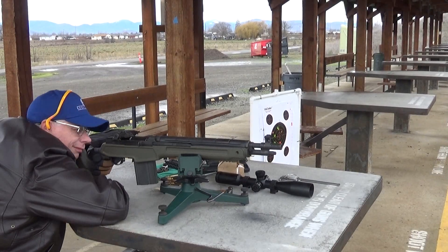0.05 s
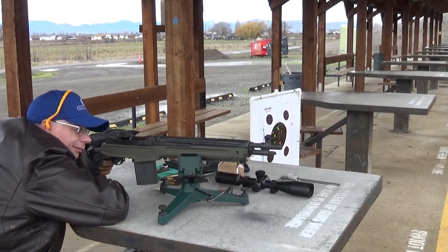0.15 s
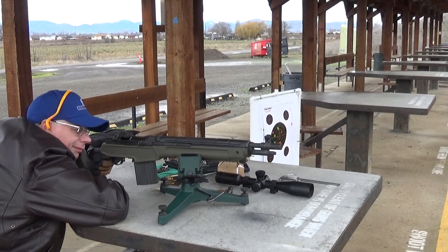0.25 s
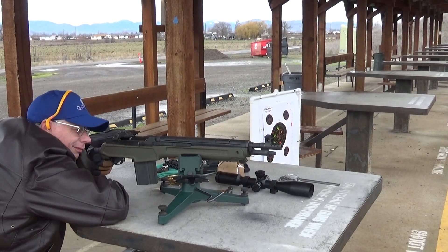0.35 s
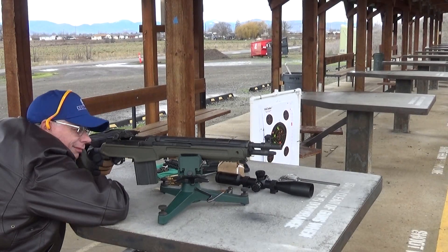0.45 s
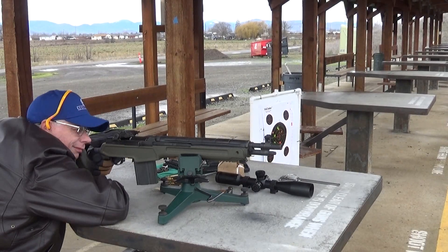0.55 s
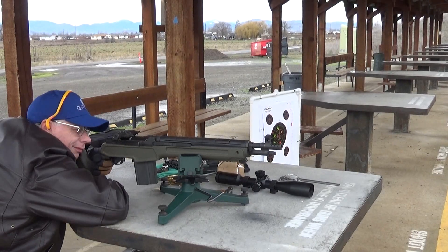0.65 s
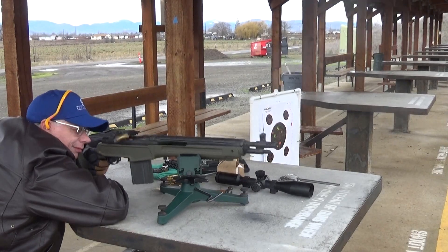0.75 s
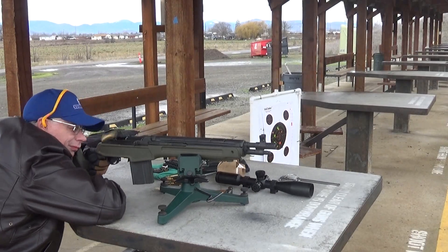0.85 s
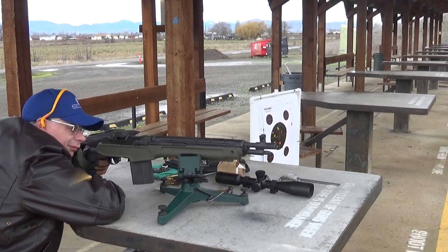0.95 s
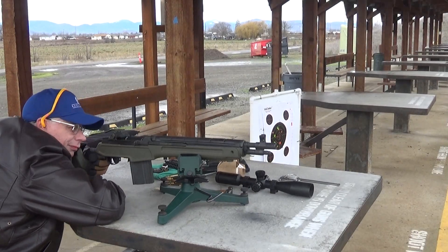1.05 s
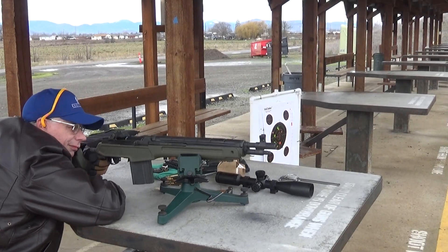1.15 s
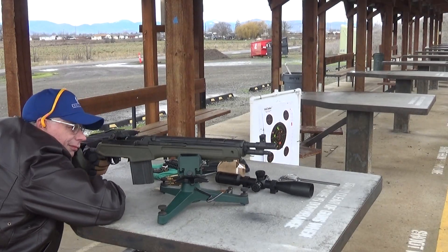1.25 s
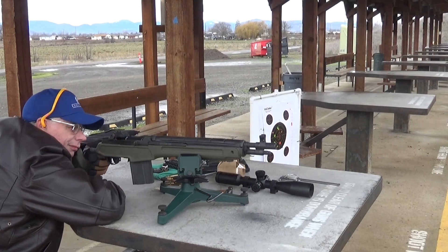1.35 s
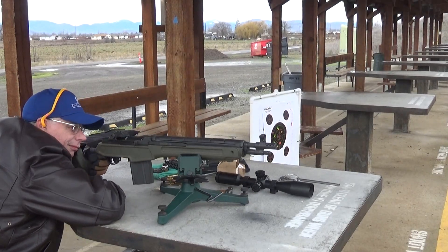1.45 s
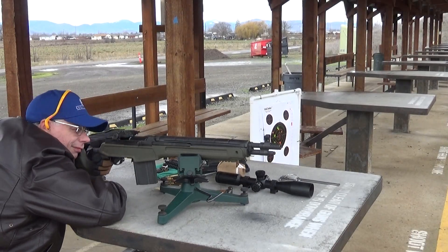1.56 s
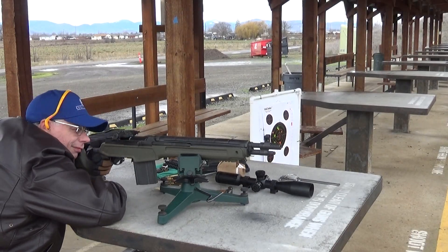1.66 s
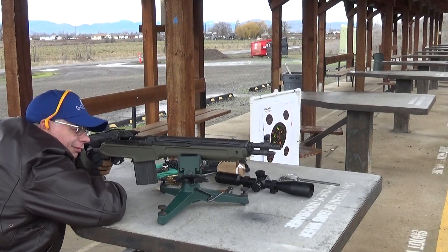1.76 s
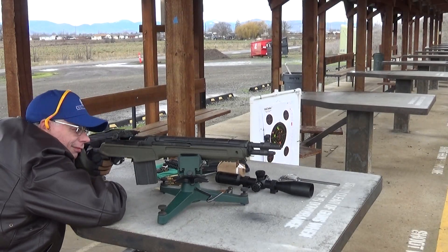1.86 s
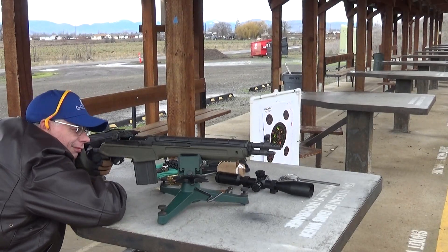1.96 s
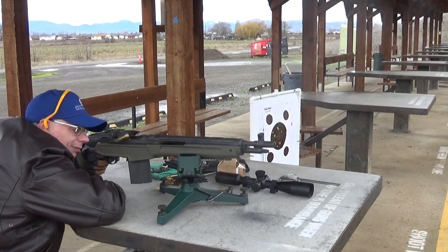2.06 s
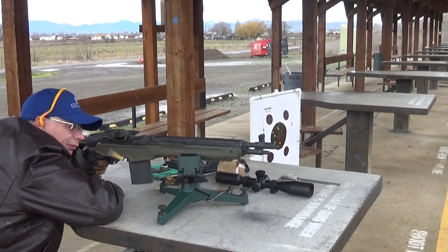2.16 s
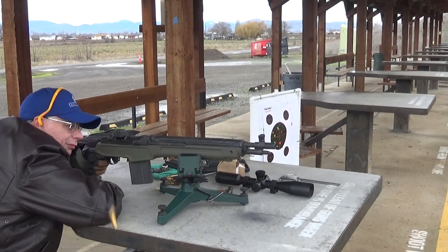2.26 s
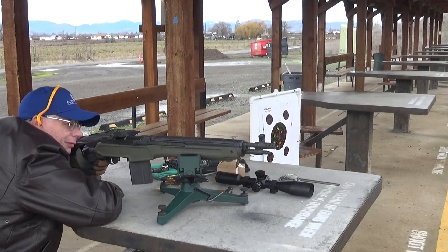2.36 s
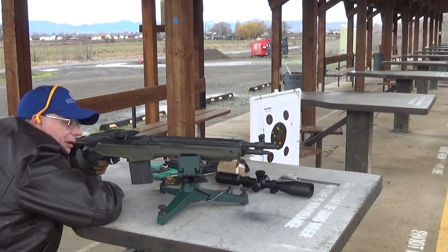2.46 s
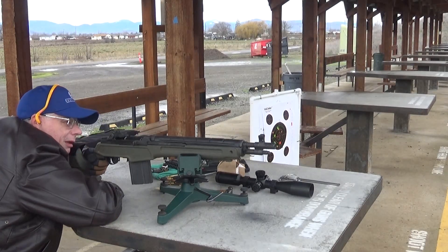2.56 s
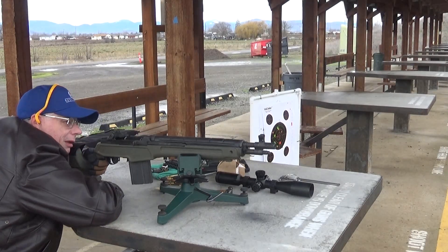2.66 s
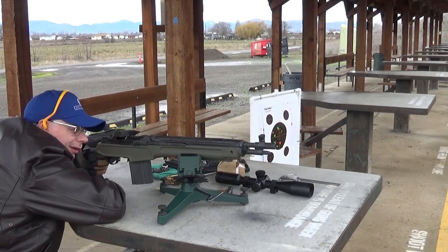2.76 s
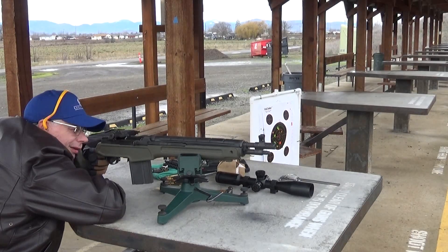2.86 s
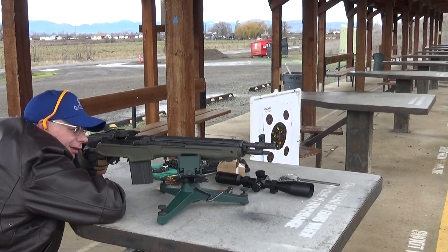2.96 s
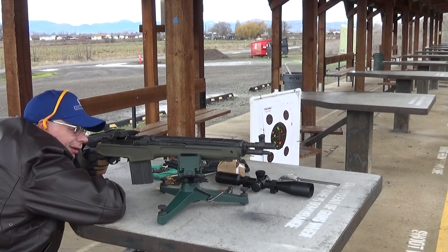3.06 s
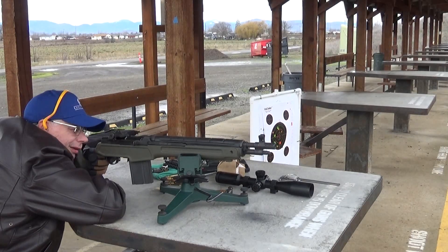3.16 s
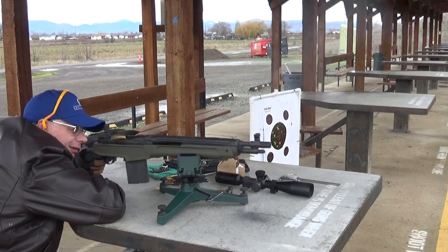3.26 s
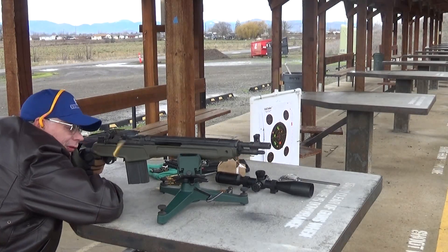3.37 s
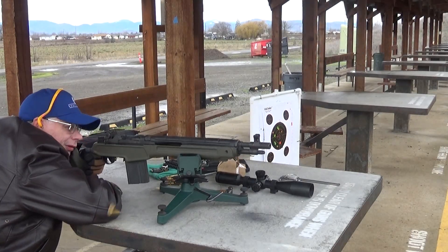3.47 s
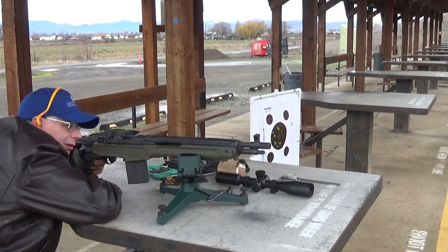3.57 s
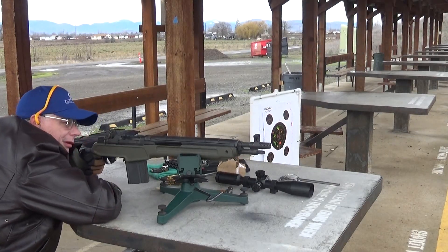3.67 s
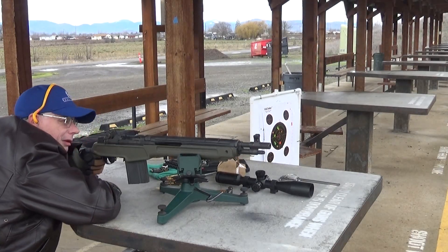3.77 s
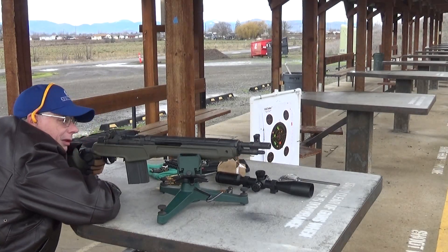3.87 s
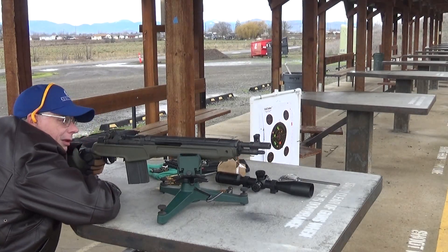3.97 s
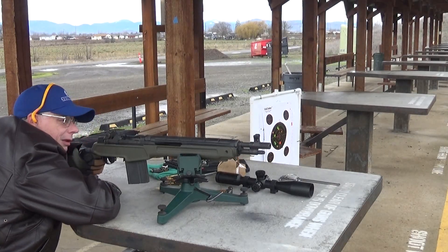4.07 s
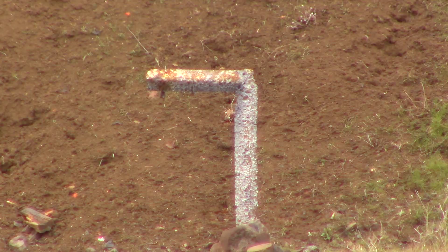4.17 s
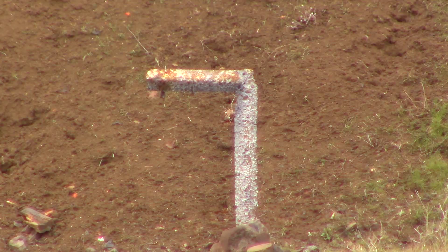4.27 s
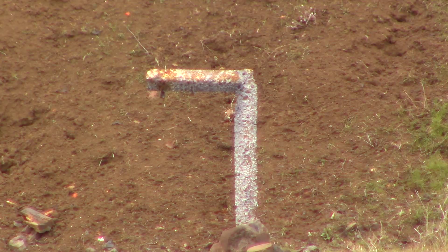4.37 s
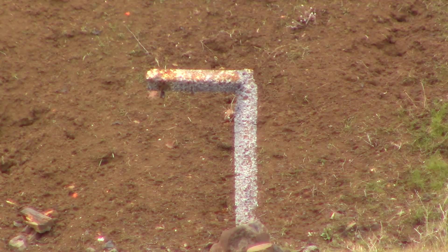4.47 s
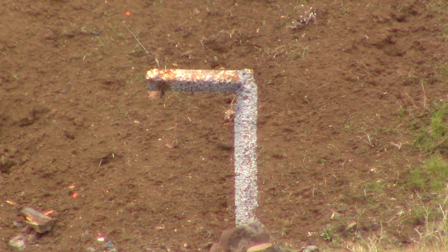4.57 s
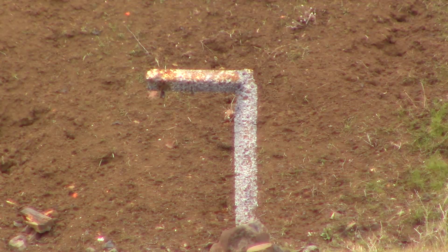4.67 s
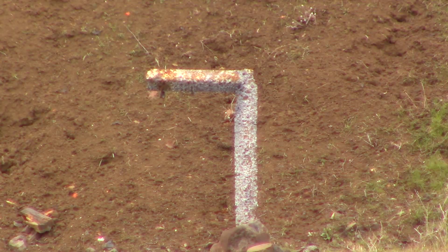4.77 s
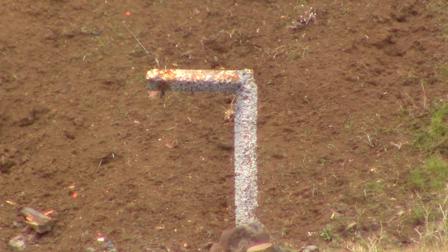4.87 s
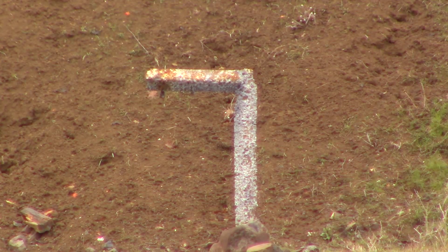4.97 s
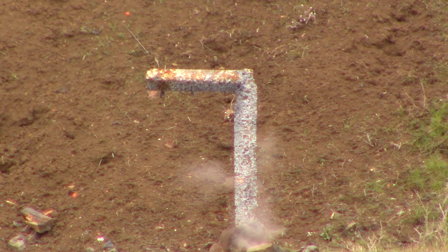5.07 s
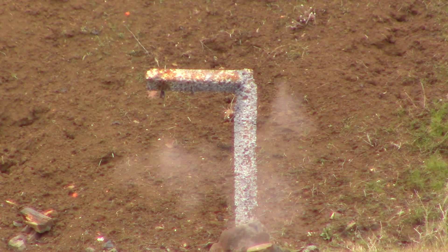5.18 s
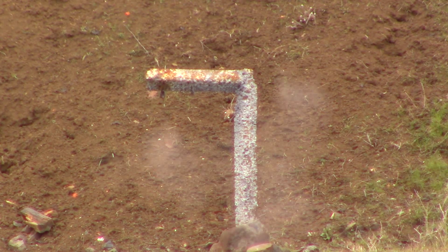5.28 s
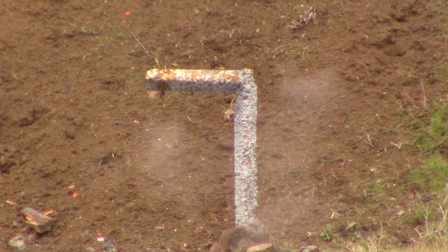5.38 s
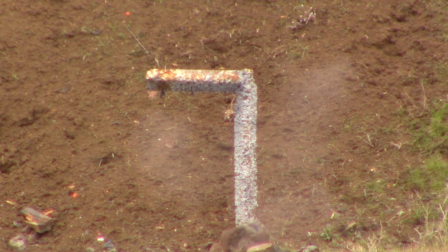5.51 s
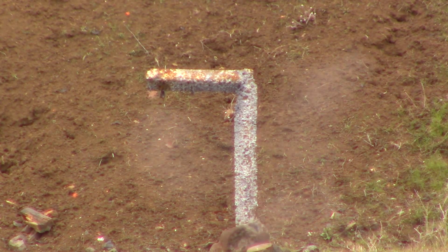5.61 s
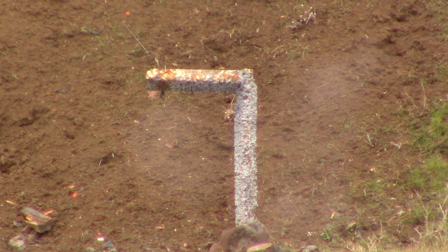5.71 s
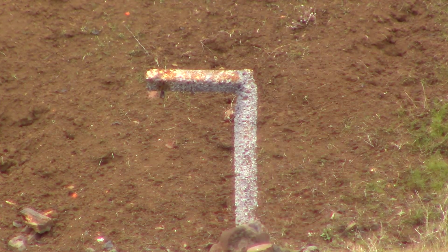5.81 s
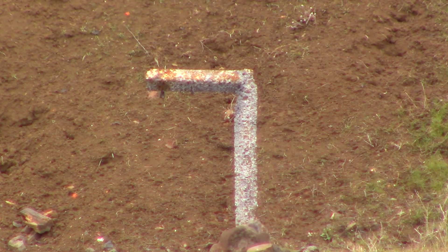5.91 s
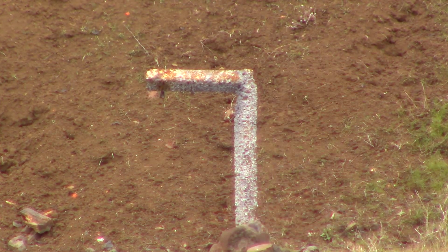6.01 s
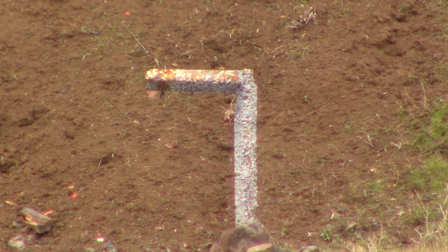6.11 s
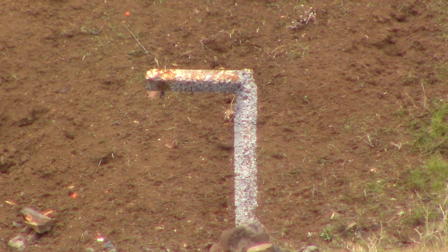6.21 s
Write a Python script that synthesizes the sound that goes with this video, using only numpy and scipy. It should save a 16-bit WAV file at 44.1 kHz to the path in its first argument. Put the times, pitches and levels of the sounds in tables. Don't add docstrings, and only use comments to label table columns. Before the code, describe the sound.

Three deliberate rifle shots, loud and slightly overloaded, are heard in stereo from near the shooter, with faint ticking from a distant motor beforehand. Each has a tiny hammer tick, a full blast, a dense echo roll and a bright ringing case on concrete. A hard cut moves downrange, where a supersonic snap precedes a duller boom and scattered returns from banks. Another cut leaves only soft wind and traffic.

```python
import sys
import numpy as np
from scipy import signal
from scipy.io import wavfile
from scipy.ndimage import map_coordinates

SR = 44100
rng = np.random.default_rng(int(sys.argv[2]) if len(sys.argv) > 2 else 0)


def wav_record(signal):
    frames = np.transpose(np.atleast_2d(signal))
    bounded = np.clip(frames, -1, 1)
    quanta = np.round(bounded * 32767).astype(np.int16)
    wavfile.write(sys.argv[1], SR, quanta)


def invert_db(level):
    return 10 ** (np.asarray(level, dtype=float) / 20)


N = 275625

# (blast_s, roll_stop_s)
SHOTS = [
    (0.7888, 1.593),
    (2.0818, 2.797),
    (3.3259, 4.178),
]
# (pitch_hz, level_db)
ROLL_COLOUR = [(60, -22.5), (130, -1.5), (210, 2.2), (350, -0.06), (1000, 3), (4000, 1.5), (9000, -2.84),
               (16000, -12.5)]
# (pitch_hz, likeness 0 to 1)
ROOF_LIKENESS = [(60, 0.93), (300, 0.68), (1400, 0.58), (7000, 0.77), (15000, 1)]
# (delay_s, (level_db per octave, centre_hz, skirt_db per octave, rise_s, fall_db per s))
BLAST = (0, (38, 7500, 6.8, .002, 252))
ROOF = (.001, (39.5, 775, 5, .018, 207))
BOOM = (0, (9, 336, 22, .032, 81))
FIELD = (.07, (-26, 3300, 10, .07, 22))
TREE_LINE = (.22, (-20, 5600, 12.5, .008, 109))
FAR_BOOM = (.4, (-28.5, 290, 14, .07, 36))
LAST_BANK = (.7, (-29.5, 2660, 17, .2, 13))


def rifle():
    out = np.zeros((2, N))
    same = rng.standard_normal((2, 2, SR))
    roof_dulling, field_dulling = .174, .12
    answers = [(*a, roof_dulling) for a in (BLAST, ROOF, BOOM)]
    answers += [(*a, field_dulling) for a in (FIELD, TREE_LINE, FAR_BOOM, LAST_BANK)]
    for blast_s, roll_stop_s in SHOTS:
        size = round((roll_stop_s - blast_s) * SR)
        fresh = rng.standard_normal((2, 2, size))
        fresh = signal.sosfilt(signal.butter(1, 1500, "high", fs=SR, output="sos"), fresh)
        white = same[..., :size] + 1.076 * fresh
        t = np.arange(size) / SR
        shot = steep(roll(answers, 0, ROLL_COLOUR, white, ROOF_LIKENESS), 110, "high")
        lows = signal.sosfilt(signal.butter(1, 2500, fs=SR, output="sos"), shot)
        shot = shot - lows * np.exp(-t / 0.0009)
        add(out, shot * invert_db([[-.4], [.4]]), blast_s)

        push = np.sin(2 * np.pi * 95 * t) * np.exp(-((t - .05) / 0.029) ** 2)
        add(out, invert_db([[-25], [-23]]) * push, blast_s)

        t = t[:round(.007 * SR)]
        tick_shape = t / 0.00096 * np.exp(1 - t / 0.0017) + 0.04
        tick = band(rng.standard_normal(len(t)), 1800, 16000) * tick_shape
        add(out, invert_db(-15) * tick, blast_s - .0072)
    return out


# (start_s, click_level_db, ring_level_db, click_pitch_hz)
BOUNCES = [
    (1.4029, 15, -18.5, 6700),
    (1.416, -23, -29, 6500),
    (2.6167, 0, -15.5, 4930),
    (2.6296, 14, -40, 6260),
    (2.641, -13, -26, 6000),
    (3.8868, 8.5, -31, 3780),
    (3.8970, -3, -21.5, 3200),
]
# (pitch_hz, level_db, t60_s)
CASES = [
    [(9539, -3, .3), (9615, 0, .28), (12440, -5, .26), (12490, -3, .25), (14760, -4, .36), (14850, -6, .35)],
    [(9520, -2, .3), (9600, -3, .3), (12510, -3, .24), (12570, -5, .23), (14620, -4, .23), (14740, -2, .23),
     (1720, -2, .03)],
    [(9615, 0, .27), (9695, -4, .29), (9798, -6, .25), (12620, -9, .33), (12700, -11, .3), (14690, -8, .3),
     (14830, -7, .27)],
]


def cases():
    out = np.zeros((2, N))
    chance = rng.random((len(BOUNCES), 8))
    tumbling = invert_db(4.5 * np.array([drift(90, SR // 3) for mode in range(8)]))
    t = np.arange(round(.09 * SR)) / SR
    roof = invert_db(-35.5) * rng.standard_normal((2, len(t))) * invert_db(-60 * t / 0.1) * (t > .003)
    roof[:, 0] = 1
    for (start_s, click_db, ring_db, click_hz), luck in zip(BOUNCES, chance):
        shot = sum(start_s > blast_s for blast_s, roll_stop_s in SHOTS) - 1
        hit = np.zeros((1, round((SHOTS[shot][1] - start_s) * SR)))
        size = hit.size
        rise = 1 - np.exp(-np.arange(size) / SR / 0.00019)
        for k, (hz, db, t60_s) in enumerate(CASES[shot]):
            mode = ring(hz, t60_s, 2 * np.pi * luck[k])[:size]
            waver = (rise * tumbling[k, :size])[:len(mode)]
            hit[0, :len(mode)] += invert_db(ring_db + db) * mode * waver
        click = invert_db(click_db) * ring(click_hz, 2.9 / click_hz)
        hit[0, :len(click)] += click
        add(out, signal.fftconvolve(hit, roof, axes=1)[:, :size], start_s)
    return out


# (pitch_hz, level_db)
FAR_COLOUR = [(100, -9), (250, -3.5), (400, -0.5), (900, -7), (1500, 1.4), (5000, 1), (9000, 1.5),
              (16000, -22.5)]
# (pitch_hz, likeness 0 to 1)
OPEN_LIKENESS = [(60, 1), (300, 0.98), (1400, 0.77), (7000, 0.57), (15000, 1)]
# (centre_s, level_db, low_hz, high_hz, half_length_s)
ECHOES = [(5.3280, -8, 1005, 8800, 0.0019), (5.355, -13, 2180, 8300, .014),
          (5.387, -12.5, 1220, 3780, 0.013), (5.427, -13, 1050, 3730, 0.0022),
          (5.441, -13.5, 1136, 3950, 0.014), (5.499, -17.5, 1090, 2420, 0.0081),
          (5.515, -21, 1090, 2500, 0.0058), (5.541, -20, 990, 4630, 0.0032),
          (5.568, -27, 1200, 3800, 0.002), (5.605, -29, 1460, 2570, 0.0087),
          (5.616, -19, 1100, 3360, 0.002), (5.69, -35, 900, 2900, 0.017), (5.748, -29, 250, 2180, 0.0074),
          (1.579, -28.5, 2500, 7000, .002), (1.586, -28, 2000, 7900, 0.0024),
          (4.115, -30.5, 2500, 6500, 0.0021), (4.1235, -36, 5000, 9800, 0.0024),
          (0.86, -15, 9700, 11030, 0.0025), (0.522, -56, 2500, 3180, 0.03)]
# (start_s, (level_db per octave, centre_hz, skirt_db per octave, rise_s, fall_db per s))
WHIP = (4.929, (-7.5, 4200, 10.5, .001, 112))
MUZZLE_BOOM = (5.066, (-4, 430, 6.5, .002, 122))
BANK_RETURN = (5.078, (-13.5, 3300, 8, .025, 78))
ECHO_WASH = (5.325, (-19, 3300, 9, .015, 82))
VALLEY = (5.35, (-29.5, 1700, 14, .16, 10))
LOW_BED = (5.328, (-37, 314, 16, .033, 24))
LATE_BOOM = (5.6, (-31, 317, 17, .03, 55))


def downrange():
    out = np.zeros((2, N))
    open_dulling = .28
    late = [MUZZLE_BOOM, BANK_RETURN, ECHO_WASH, VALLEY, LOW_BED, LATE_BOOM]
    for group, end_s, likeness in (([WHIP], 5.066, ROOF_LIKENESS), (late, 5.867, OPEN_LIKENESS)):
        start_s = group[0][0]
        white = rng.standard_normal((2, 2, round((end_s - start_s) * SR)))
        answers = [(begin_s, answer, open_dulling) for begin_s, answer in group]
        add(out, roll(answers, start_s, FAR_COLOUR, white, likeness), start_s)
    for centre_s, db, low_hz, high_hz, half_s in ECHOES:
        t = np.arange(-.04, .04, 1 / SR)
        burst = band(rng.standard_normal(len(t)), low_hz, high_hz) * np.sqrt(SR / 2 / (high_hz - low_hz))
        burst = steep(burst, 0.62 * low_hz, "high")
        burst = steep(burst, min(1.75 * high_hz, 10500), "low")
        grain = invert_db(3.2 * drift(400, len(t)))
        swell = np.exp(-(t / half_s * np.where(t < 0, 1.5, 1)) ** 2 / 2)
        add(out, invert_db(db) * burst * grain * swell, centre_s + t[0])
    return steep(out, 232, "high") * invert_db([[.55], [-.55]])


# (start_s, peak_level_db, pitch_hz, length_cycles, first swing + or -)
SHOCKS = [(4.9256, 6.5, 4000, 4.1, -1), (4.9285, 10, 2910, 2.29, -1), (5.0636, 1.5, 1750, 1.35, -1),
          (5.0639, 2.5, 362, 1.8, 1), (5.0677, -9, 2430, 7.7, -1), (5.1265, -13, 424, 1.4, 1),
          (5.159, -18, 450, 1.6, 1), (5.2353, -11, 490, 2.6, -1), (5.3232, -3.5, 1500, 1.04, -1),
          (5.3266, -8.5, 1110, 2.7, -1), (1.5892, -20.5, 350, 1.2, 1), (4.1265, -12, 223, 1.12, 1)]


def shocks():
    out = np.zeros((2, N))
    for start_s, db, hz, cycles, sign in SHOCKS:
        turn = np.arange(int(cycles / hz * SR)) * hz / SR
        swing = np.sin(2 * np.pi * turn) * (1 - (turn / cycles) ** 12.0)
        add(out, np.sign(sign) * invert_db(db) * swing, start_s)
    return signal.sosfilt(signal.butter(2, 110, "high", fs=SR, output="sos"), out)


# (start_s, depth_db, recovery_s)
DUCKS = [
    (4.926, 8, .065),
    (5.064, 7, .045),
]
EDGES_HZ = 35 * 2 ** (np.arange(28) / 3)


def roll(answers, start_s, colour, white, likeness):
    ceiling_db, release_db_per_s = -9.5, 300
    low_lag = 0.5
    uneven_db = 1.5
    hz = np.sqrt(EDGES_HZ[1:] * EDGES_HZ[:-1])[:, None]
    t = start_s + np.arange(0, white.shape[-1] + 32, 32) / SR
    power = 1e-12
    for begin_s, (db, centre_hz, skirt_db, rise_s, fall_db), dulling in answers:
        age = np.maximum(t - begin_s, 0)
        skirt = skirt_db * (np.hypot(1, np.log2(hz / centre_hz)) - 1)
        fall = fall_db * age * (hz / centre_hz) ** dulling
        slow_rise_s = rise_s * np.maximum(centre_hz / hz, 1) ** low_lag
        growth = 1 - np.exp(-age / slow_rise_s)
        power = power + (invert_db(db - skirt - fall + at_hz(colour, hz)) * growth) ** 2

    over_db = np.maximum(10 * np.log10(power.sum(axis=0) / 3) - ceiling_db, 0)
    recovery_db = release_db_per_s * t
    cut_db = np.maximum.accumulate(over_db + recovery_db) - recovery_db
    for duck_s, depth_db, recovery_s in DUCKS:
        cut_db = cut_db + depth_db * (t > duck_s) * np.maximum(1 - (t - duck_s) / recovery_s, 0)

    per_hz = 10 * np.log10(power * SR / 2 / (hz * np.log(2)))
    per_hz = per_hz - cut_db + uneven_db * drift(70 * 32, len(t))
    fine = start_s + np.arange(white.shape[-1]) / SR

    def level_db(band_hz):
        return np.interp(fine, t, per_hz[np.argmin(np.abs(hz - band_hz))])

    return bank(white, level_db, likeness)


def bank(white, level_db, likeness):
    out = 0
    for k, (low_hz, high_hz) in enumerate(zip(EDGES_HZ, EDGES_HZ[1:])):
        mid, side = band(white[k % 2], low_hz, high_hz)
        hz = np.sqrt(low_hz * high_hz)
        alike = np.clip(at_hz(likeness, hz), 0, 1)
        stereo = np.sqrt(1 + alike) * mid + np.sqrt(1 - alike) * side * [[1], [-1]]
        out = out + invert_db(level_db(hz)) * stereo
    return out / np.sqrt(2)


def ring(hz, t60_s, phase=0):
    t = np.arange(int(t60_s * SR) + 8) / SR
    return np.sin(2 * np.pi * hz * t + phase) * invert_db(-60 * t / t60_s)


def band(x, low_hz, high_hz):
    return signal.sosfilt(signal.butter(2, [low_hz, high_hz], "band", fs=SR, output="sos"), x)


def steep(x, hz, kind):
    return signal.sosfilt(signal.butter(4, hz, kind, fs=SR, output="sos"), x)


def drift(rate_hz, size):
    knots = rng.standard_normal(int(size * rate_hz / SR) + 3)
    return map_coordinates(knots, [np.arange(size) * rate_hz / SR], order=3)


def at_hz(points, hz):
    table_hz, value = np.transpose(points)
    return np.interp(np.log(hz), np.log(table_hz), value)


def add(out, x, start_s):
    i = round(start_s * SR)
    out[:, i:i + x.shape[-1]] += x[..., :N - i]


def idling_tick():
    t = np.arange(round(.775 * SR)) / SR
    beat = np.maximum(np.sin(2 * np.pi * 30.05 * (t - .014)), 0) * invert_db(drift(20, len(t)))
    phase = 2 * np.pi * np.cumsum(1 + .012 * drift(90, len(t))) / SR
    return invert_db(-53) * beat * (np.sin(2715 * phase) + invert_db(-13) * np.sin(3480 * phase))


def air(spectrum, levels, start_s, end_s, patchy_db):
    size = round((end_s - start_s) * SR)
    gusts = drift(6.8, size)

    def level_db(hz):
        lumps = patchy_db * (.5 * gusts + drift(14, size)) * min(1, (200 / hz) ** .5)
        return at_hz(spectrum, hz) + lumps

    noise = bank(rng.standard_normal((2, 2, size)), level_db, OPEN_LIKENESS)
    level_s, db = np.transpose(levels)
    return noise / noise.std() * invert_db(np.interp(start_s + np.arange(size) / SR, level_s, db))


def gain_control():
    t = np.arange(round(SHOTS[-1][1] * SR)) / SR
    duck_db = 0
    for blast_s, roll_stop_s in SHOTS:
        active = (t > blast_s) & (t < roll_stop_s)
        duck_db = duck_db - active * (3.7 + 19.0 * np.exp(-np.abs(t - blast_s) / 0.26))
    return invert_db(duck_db)


# (pitch_hz, level_db per Hz)
NEAR_AIR = [(18, -44), (30, -15), (79, -2), (192, -9), (230, -12.5), (332, -16), (945, -12.5), (1680, -27),
            (2070, -36.5), (2690, -34), (3070, -39), (4540, -42), (8720, -44), (15500, -49.5)]
FAR_AIR = [(18, -62), (30, -32), (64, -55), (119, -5), (171, -19), (240, 7.5), (274, -19), (304, -8),
           (328, 1), (698, -6.5), (815, 2.5), (1870, -18), (4540, -22.5), (15000, -37.5)]
LAST_AIR = [(30, -38.5), (100, -34.5), (200, -22), (346, -16.5), (458, -14), (631, -4), (962, -9),
            (1330, -10), (1550, -16), (1850, -13.5), (2300, -21), (3500, -23.5), (4200, -36.5),
            (15000, -52.5)]
# (time_s, level_db)
FAR_LEVEL = [(4.18, -43.5), (4.6, -44), (4.88, -45), (4.91, -50), (4.924, -66)]
LAST_LEVEL = [(5.89, -35.5), (5.932, -38.5), (5.974, -35), (6.04, -36.5), (6.122, -30.5), (6.152, -34.5),
              (6.24, -34.5)]


def scene():
    out = rifle() + cases() + downrange() + shocks()
    add(out, air(NEAR_AIR, [(0, -34)], 0, 4.178, patchy_db=2.5) * gain_control(), 0)
    add(out, air(FAR_AIR, FAR_LEVEL, 4.178, 5.868, patchy_db=1.), 4.178)
    add(out, air(LAST_AIR, LAST_LEVEL, 5.868, N / SR, patchy_db=2.), 5.868)
    add(out, idling_tick(), 0)
    return out


def lose_weak_treble(x, floor_db, quiet_db, from_hz):
    hz, t, z = signal.stft(x, SR, nperseg=1024)
    power = np.sum(np.abs(z) ** 2, axis=0)
    bands = np.repeat(power[:-1].reshape(64, 8, -1).sum(axis=1), 8, axis=0)
    loudness = power.sum(axis=0)
    strong = bands > loudness * invert_db(2 * floor_db)
    quiet_moment = loudness < invert_db(2 * quiet_db)
    z[:, :-1] *= strong | quiet_moment | (hz[:-1, None] < from_hz)
    return signal.istft(z, SR, nperseg=1024)[1][:, :N]


def top_cut(x):
    return signal.sosfilt(signal.butter(12, 16490, fs=SR, output="sos"), x)


def record(dry):
    soft = 0.88 * np.tanh(dry / 0.83)
    cut = signal.sosfilt(signal.cheby2(10, 50, 16300, fs=SR, output="sos"), soft)
    lean = lose_weak_treble(cut, floor_db=-45, quiet_db=-28.5, from_hz=10300)
    mix = np.clip(lean, -1, 1)
    return top_cut(mix)


dry = scene()
out = record(dry)
wav_record(out)
```